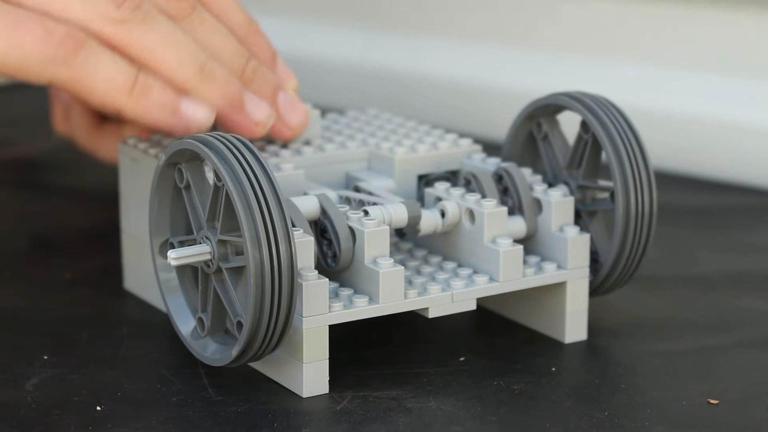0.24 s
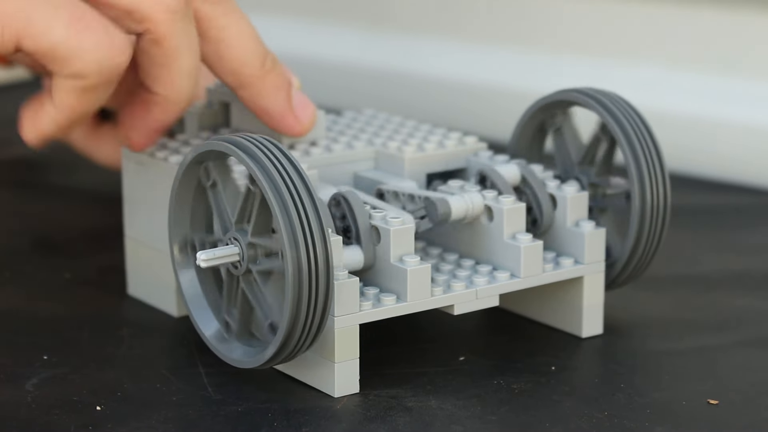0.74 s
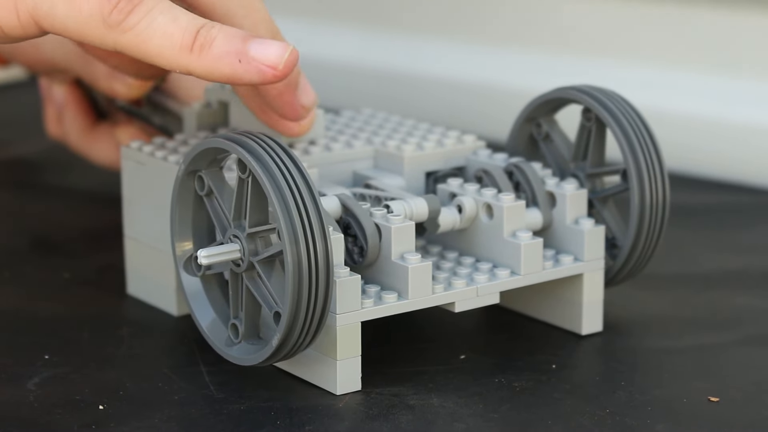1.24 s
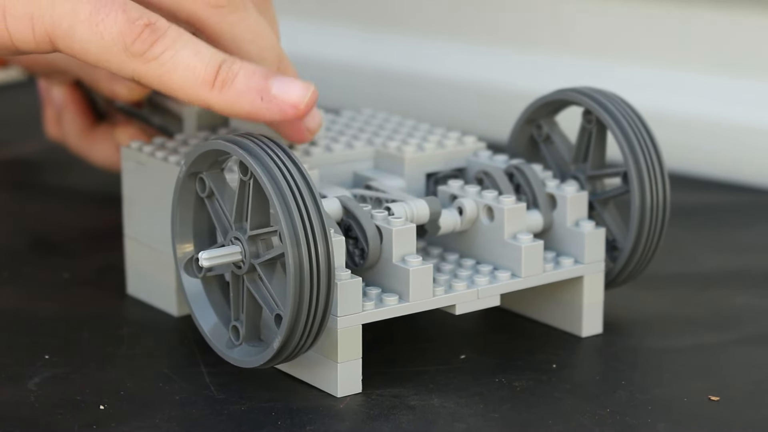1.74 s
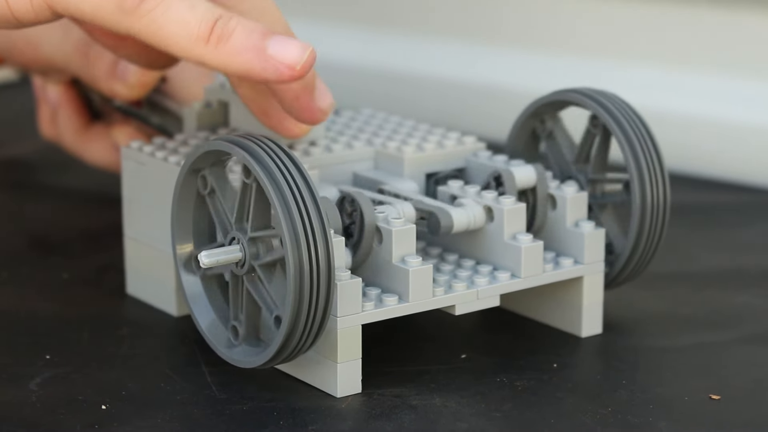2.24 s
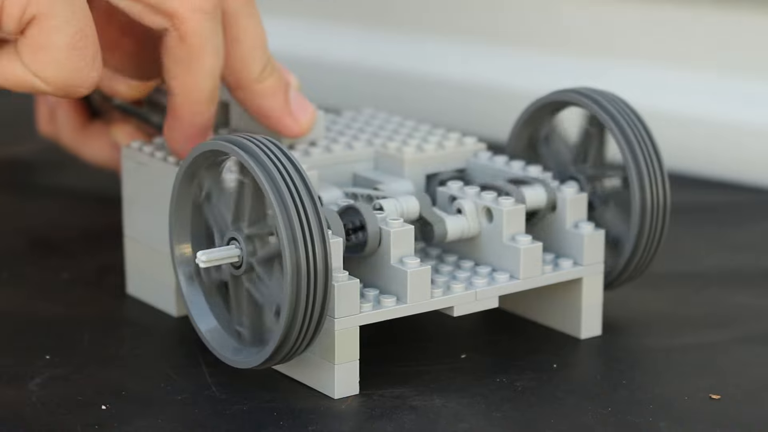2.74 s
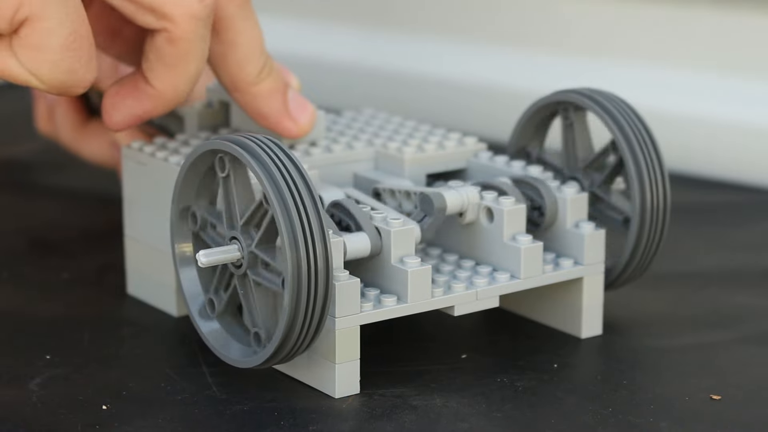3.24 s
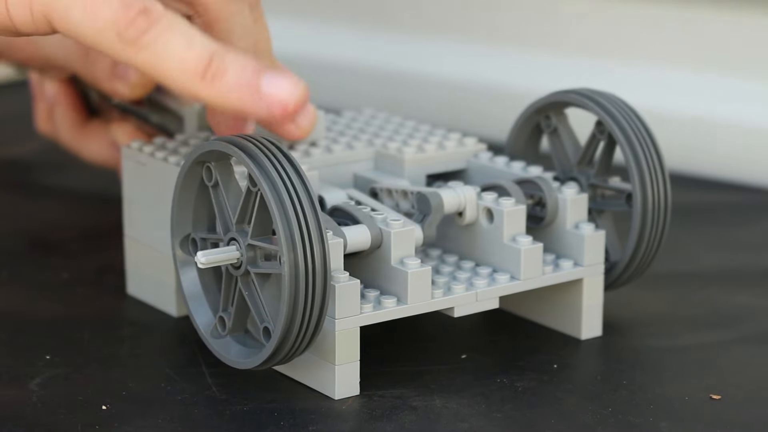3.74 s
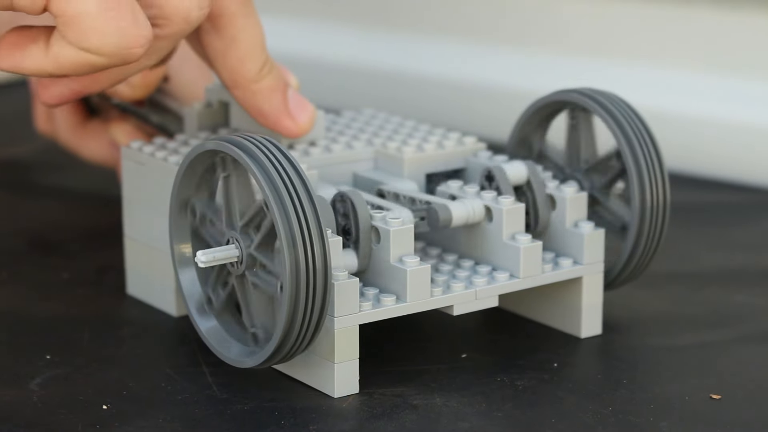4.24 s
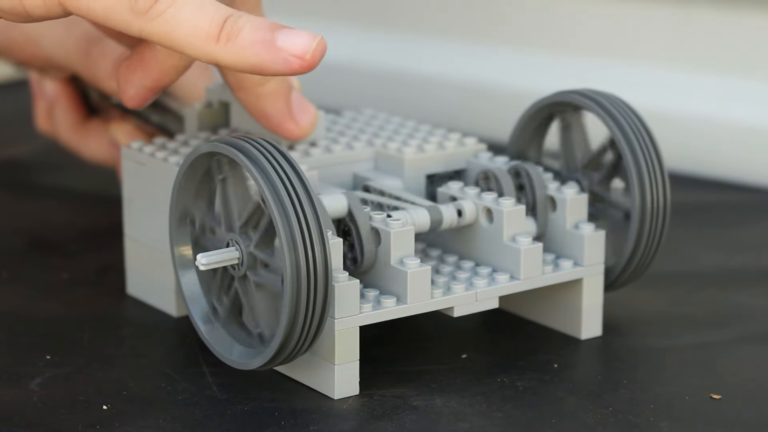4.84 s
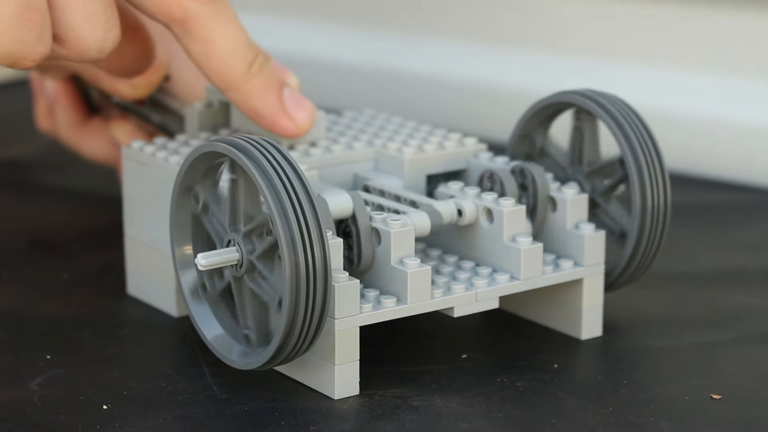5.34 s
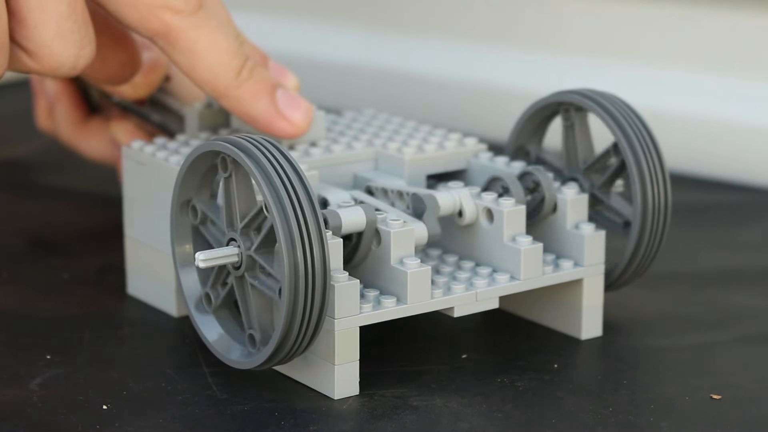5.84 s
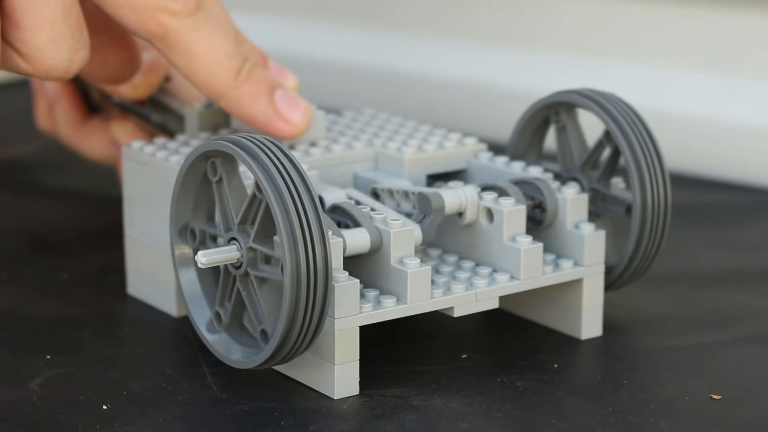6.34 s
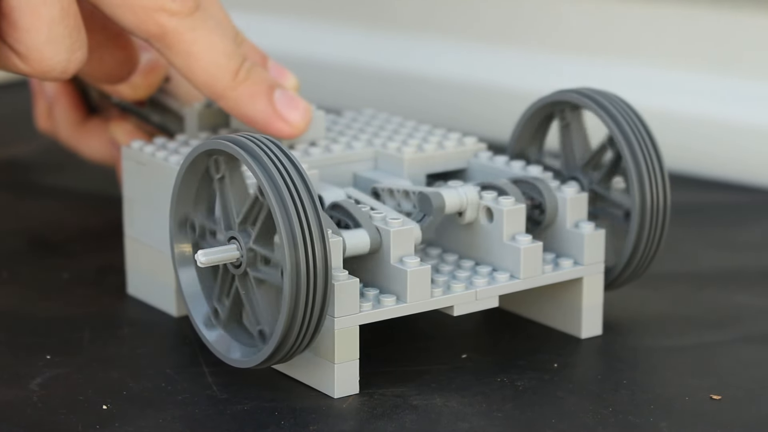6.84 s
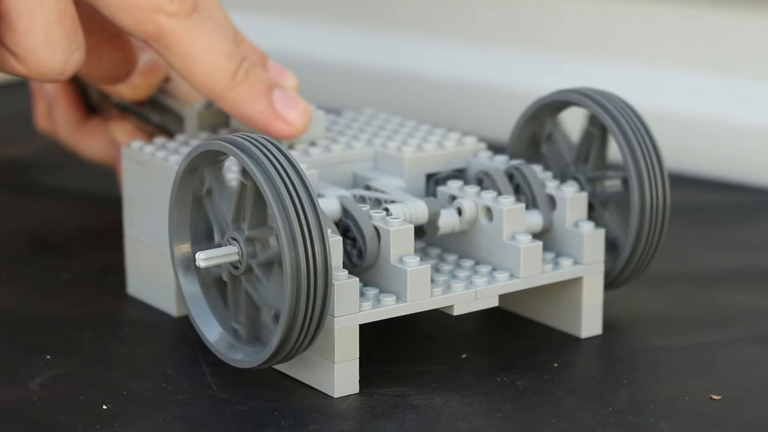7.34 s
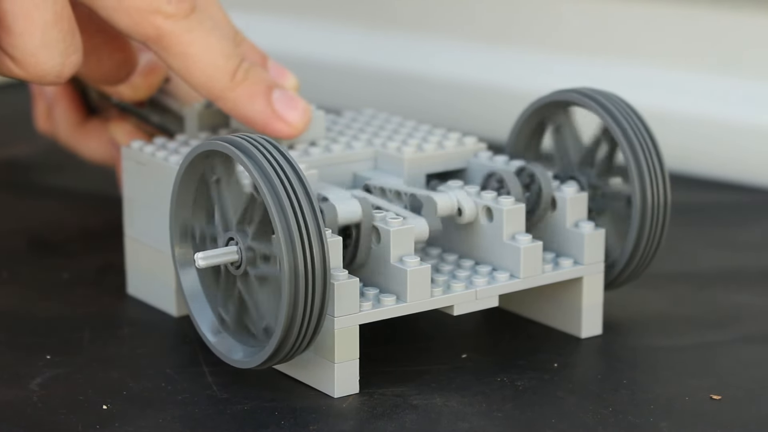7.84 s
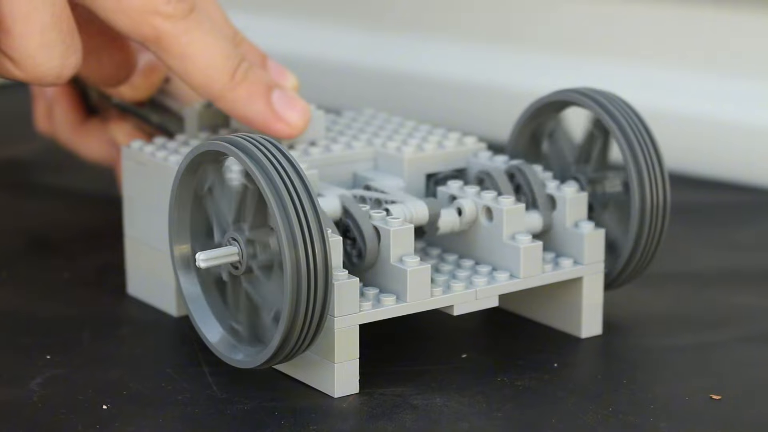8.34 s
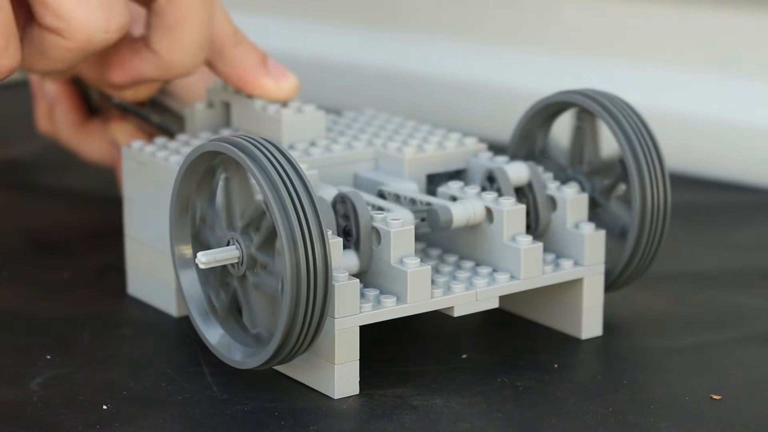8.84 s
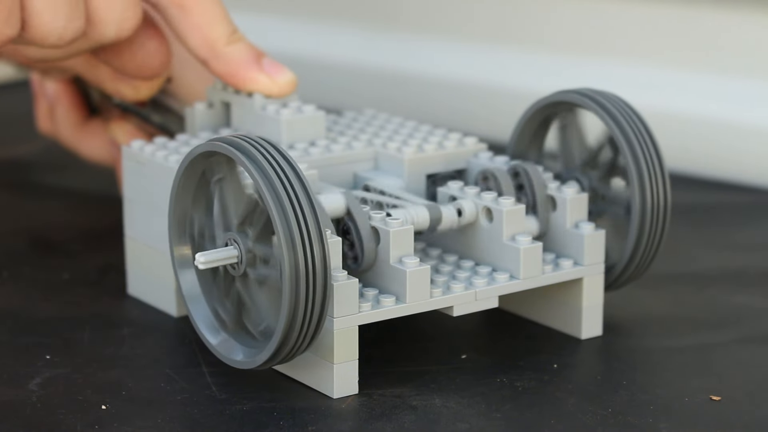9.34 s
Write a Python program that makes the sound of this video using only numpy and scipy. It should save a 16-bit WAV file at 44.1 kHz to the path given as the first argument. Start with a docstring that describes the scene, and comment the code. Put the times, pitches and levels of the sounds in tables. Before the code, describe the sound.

Close, sharp air hiss from a toy-sized piston engine, first constant, then chopped by uneven exhaust bursts that speed up to about five per second.

```python
"""Outdoors, on a table close by: a small plastic piston engine runs on compressed air.
At first it stands stalled and the air just leaks; nudged by a finger it turns in fits, then picks up speed.
The leak past the loose valve is shaped noise, and each turn lets out one exhaust puff, a short burst of noise.
Around it are a breeze that dies down, a faint low hum, soft finger scuffs and the knocks of a slack crank."""
import sys
import numpy as np
from scipy import signal
from scipy.fft import rfft, irfft, next_fast_len
from scipy.io import wavfile
from scipy.ndimage import map_coordinates

SR = 44100
rng = np.random.default_rng(int(sys.argv[2]) if len(sys.argv) > 2 else 0)


def generate_wav(signal):
    """Clip the signal to [-1, 1] and save it as 16-bit WAV at the path in sys.argv[1]."""
    frames = np.transpose(np.atleast_2d(signal))
    scaled = np.clip(frames, -1, 1) * 32767
    pcm = np.round(scaled).astype(np.int16)
    wavfile.write(sys.argv[1], SR, pcm)


N = 422919
TIME = np.arange(N) / SR   # s
FREQS = np.maximum(np.fft.rfftfreq(2 ** 15, 1 / SR), 1)   # Hz, kept above zero for the logarithms
RUNS_FREE_S = 5.1   # from here on the engine turns without help


def from_db(db):
    """Turn decibels into gain."""
    return 10 ** (np.asarray(db) / 20)


def rms_one(x):
    """Scale a signal to an average strength (rms) of 1."""
    return x / np.sqrt(np.mean(x ** 2) + 1e-20)


def in_time(rows):
    """Draw one curve over time per column, straight between the rows."""
    s, *columns = np.transpose(rows)
    return [np.interp(TIME, s, column) for column in columns]


def gain_at(points, hz):
    """Read the gain off a (frequency, level) table, straight on a log-frequency axis."""
    points = np.array(points)
    return from_db(np.interp(np.log(hz), np.log(points[:, 0]), points[:, 1]))


def noise(gain):
    """Make noise whose amplitude per root Hz is given on FREQS."""
    size = next_fast_len(N, True)
    gain = np.interp(np.fft.rfftfreq(size, 1 / SR), FREQS, gain)
    real, imaginary = rng.standard_normal((2, len(gain)))
    return irfft((real + 1j * imaginary) * gain, size)[:N] * np.sqrt(SR * size) / 2


def drift(rate):
    """Wander at random, up to about this rate per second, with a spread of 1."""
    step = 20   # samples between the points of the curve
    size = N // step + 2
    hz = np.fft.rfftfreq(size, step / SR)
    slow = irfft(rfft(rng.standard_normal(size)) / (1 + (hz / rate) ** 2), size)
    return np.interp(np.arange(N) / step, np.arange(size), rms_one(slow))


def plateau_at(s, length):
    """Find the samples around a moment, and a flat-topped hump of height 1 over them."""
    near = slice(max(int((s - length) * SR), 0), int((s + length) * SR))
    return near, np.exp(-np.abs(2 * (TIME[near] - s) / length) ** 4)


# how far the valve rests in its stalled position: (time [s], share [0-1])
VALVE_STALL = [(0, 0.96), (1.35, 0.97), (1.6, 0.34), (2.0, 0.04)]


def stalled_share():
    """Follow the valve from its stalled position (near 1) to running (near 0)."""
    return in_time(VALVE_STALL)[0]


def unrest(stalled_calm=0.35):
    """The air stream is calmer while the engine stands and restless once it moves."""
    return 1 - stalled_calm * stalled_share()


# exhaust puffs, one per turn: (time of the middle [s], length [s], level before a common trim [dB per Hz])
EXHAUST_PUFFS = [(1.64, 0.27, -61), (1.935, .092, -63), (2.093, 0.11, -60), (2.726, 0.079, -59),
                 (2.985, .11, -60), (3.918, 0.074, -61.5), (4.14, 0.075, -59), (4.458, 0.093, -60),
                 (4.858, .11, -60), (5.386, .16, -59.5), (5.969, 0.15, -59.5), (6.579, 0.16, -60),
                 (7.016, 0.13, -60.5), (7.367, 0.091, -60), (7.666, .084, -59.5), (7.923, 0.082, -60.5),
                 (8.162, 0.078, -59.5), (8.381, 0.055, -60), (8.593, .062, -59.5), (8.802, .068, -60),
                 (9.002, 0.061, -60), (9.2, 0.083, -60.5), (9.393, 0.067, -59.5), (9.59, 0.081, -60)]


def crank_turns():
    """The crank turns once from puff to puff."""
    return np.interp(TIME, [puff[0] for puff in EXHAUST_PUFFS], np.arange(len(EXHAUST_PUFFS)))


def around_puffs(overlap):
    """Rise to 1 during each puff, its length stretched by the overlap."""
    out = np.zeros(N)
    for s, length, _ in EXHAUST_PUFFS:
        near, hump = plateau_at(s, length * overlap)
        out[near] += hump
    return np.minimum(out, 1)


# wind rumble, only its shape counts: (frequency [Hz], relative level [dB])
WIND_RUMBLE = [(15, -20), (26, 0.5), (36, 1.5), (52, -1.5), (75, -4), (130, -7.5), (180, -12), (400, -20.5),
               (800, -25)]
# still outdoor air: (frequency [Hz], level [dB per Hz])
STILL_AIR = [(20, -100), (90, -94.5), (125, -90), (170, -99.5), (210, -94), (265, -102.5), (330, -90),
             (430, -103), (1500, -110)]
# the low hum before it wavers: (time [s], level [dB])
LOW_HUM = [(0, -60), (.6, -56.5), (.9, -56.5), (1.5, -57), (1.7, -65), (2.6, -67.5), (3.1, -75),
           (9.59, -91)]
HUM_HZ = 108
# a light breeze blows at first, then dies down
BREEZE_DB, LULL_DB, BREEZE_SAG_DB_PER_S = -51.5, -69.5, 1.5
BREEZE_ENDS_S, LULL_STARTS_S = 1.5, 1.75


def outdoors(gust_db=0.5, gust_rate=3, wander_hz=6.2, waver_db=2.5, octave_db=-18.5):
    """Rumbling noise for the breeze, faint noise for still air, and a hum of two tones that wander in pitch."""
    blowing = np.interp(TIME, [BREEZE_ENDS_S, LULL_STARTS_S], [1, 0])
    breeze_db = BREEZE_DB - BREEZE_SAG_DB_PER_S * TIME
    wind_db = blowing * breeze_db + (1 - blowing) * LULL_DB + gust_db * drift(gust_rate)
    rumble = gain_at(WIND_RUMBLE, FREQS) * (FREQS < WIND_RUMBLE[-1][0])
    wind = from_db(wind_db) * rms_one(noise(rumble))
    phase = 2 * np.pi * np.cumsum(HUM_HZ + wander_hz * drift(12.7)) / SR
    tone = np.sqrt(2) * (np.sin(phase) + from_db(octave_db) * np.sin(2 * phase))
    hum = from_db(in_time(LOW_HUM)[0] + waver_db * drift(11)) * tone
    return wind + hum + noise(gain_at(STILL_AIR, FREQS))


# where in each turn the slack crank knocks: (crank angle [turns], relative level [dB])
KNOCK_ANGLES = [(.23, 0), (.6, -1.5)]
# knock level at this speed before a common trim, and how much harder it gets when the speed doubles
KNOCK_DB, KNOCK_AT_TURNS_PER_S, KNOCK_DB_PER_DOUBLING = -52.5, 5, 11


def crank_knocks():
    """The slack crank knocks twice a turn, harder as it speeds up: rows of (time [s], level [dB])."""
    times = [puff[0] for puff in EXHAUST_PUFFS]
    rows = []
    for s, period in zip(times, np.diff(times)):
        if s <= RUNS_FREE_S:
            continue
        speed_db = -KNOCK_DB_PER_DOUBLING * np.log2(period * KNOCK_AT_TURNS_PER_S)
        for angle, db in KNOCK_ANGLES:
            rows.append((s + angle * period, KNOCK_DB + db + speed_db))
    return rows


# soft scuffs of the finger on the frame: (time [s], level before a common trim [dB])
FINGER_SCUFFS = [(.659, -43), (.709, -38), (.744, -42), (.789, -49), (1.88, -44.5), (2.727, -46),
                 (2.794, -48)]
# what the frame resounds with on the table: (frequency [Hz], width [Hz], relative level [dB])
FRAME_RESONANCES = [(126, 42, -10), (207, 25, -6), (326, 45, 2.5), (484, 270, -11)]
KNOCK_DECAY_S = .17   # time to fade by 60 dB


def knocks(trim_db=-1.5, rise_s=.007):
    """Each touch is a short soft scrape that fades, coloured by the frame's resonances."""
    colour = sum(from_db(db) / (1 + (2 * (FREQS - hz) / width) ** 2) for hz, width, db in FRAME_RESONANCES)
    force = np.zeros(N)
    for s, db in list(FINGER_SCUFFS) + crank_knocks():
        near = (TIME > s - rise_s) & (TIME < s + KNOCK_DECAY_S)
        age = TIME[near] - s + rise_s
        rise = 1 - np.exp(-age / rise_s)
        fade = np.exp(-np.log(1000) * age / KNOCK_DECAY_S)
        force[near] += from_db(db + trim_db) * rise * fade
    return force * rms_one(noise(colour))


# reflections off the moving rods and wheels:
# (delay [s], swing of the delay [s], gain [factor], crank angle [turns])
ROD_REFLECTIONS = [(.00163, 0.000019, -0.085, 0), (.00294, 0.000033, 0.086, 0.42),
                   (.00385, .00002, 0.096, .6)]


def off_the_rods(air):
    """The short echo paths swing with the crank, and the hiss swirls in step."""
    turns = crank_turns()
    out = air.copy()
    for delay, swing, gain, angle in ROD_REFLECTIONS:
        lag = delay + swing * np.cos(2 * np.pi * (turns + angle))
        out += gain * np.interp(TIME - lag, TIME, air)
    return out


def sputter(flutter_db=0.37, flutter_rate=220, waver_db=0.52, waver_rate=22):
    """The rattling valve makes the whole stream flutter a little."""
    return from_db(unrest() * (flutter_db * drift(flutter_rate) + waver_db * drift(waver_rate)))


# resonances of the gaps and hollows in the housing, at full ring: (frequency [Hz], width [Hz], lift [dB])
HOUSING_RESONANCES = [(1010, 620, 0.5), (1610, 380, 4), (2287, 270, 4.5), (3330, 830, 1), (4032, 210, 4),
                      (5350, 98, 9.5), (5950, 270, 4), (6300, 250, 8.5), (6865, 140, 6.5), (7600, 260, 2),
                      (7930, 350, 3), (8360, 330, 6), (8800, 260, 6.5), (9510, 420, 9), (10214, 540, 9),
                      (10700, 210, 7), (11180, 290, 9), (12150, 160, 0), (12450, 219, 7),
                      (13050, 230, 10.5)]


def housing_db(hz):
    """The housing lifts the hiss at each of its resonances."""
    return sum(db * np.exp(-(2 * (hz - centre) / width) ** 2) for centre, width, db in HOUSING_RESONANCES)


def small_source(hz, edge_hz=330):
    """So small an outlet radiates hardly any bass."""
    return 1 / np.sqrt(1 + (edge_hz / hz) ** 6)


# colour of the blow-by before housing and outlet: (frequency [Hz], level [dB per Hz])
BLOW_BY_COLOUR = [(400, -98), (900, -84.5), (2500, -74), (3900, -63.5), (6000, -97), (8500, -80),
                  (10600, -59.5), (12800, -69), (15500, -81)]
# the valve sticks ajar once and air blows past it
BLOW_BY_START_S, BLOW_BY_END_S, BLOW_BY_EDGE_S, BLOW_BY_SAG_DB_PER_S = 3.295, 3.7, 0.024, 3.5


def blow_by(ring=0.64):
    """A bright hiss that starts fast, sags with the pressure and is cut off when the valve moves on."""
    since_start = TIME - BLOW_BY_START_S
    gate = np.clip(np.minimum(since_start, BLOW_BY_END_S - TIME) / BLOW_BY_EDGE_S, 0, 1)
    sag = from_db(-BLOW_BY_SAG_DB_PER_S * np.maximum(since_start, 0))
    colour = gain_at(BLOW_BY_COLOUR, FREQS) * from_db(ring * housing_db(FREQS)) * small_source(FREQS)
    return gate * sag * noise(colour)


# the faltering crank catches and pinches the leak, before each band's own throttling:
# (time of the middle [s], length [s], loss [dB])
CRANK_CATCHES = [(2.22, 0.092, 0.5), (2.797, 0.059, 2), (3.087, 0.063, 2), (3.76, 0.22, 2.5),
                 (4.01, 0.11, 2.5), (4.6, .16, 1.2), (4.984, 0.057, 0)]
PORT_SHUTS = 0.53   # share of the leak's power that a puff takes away, before each band's own throttling


def valve_opening(overlap):
    """The leak is throttled from just before each puff until just after it, and wherever the crank catches."""
    pinch_db = np.zeros(N)
    for s, length, db in CRANK_CATCHES:
        near, hump = plateau_at(s, length)
        pinch_db[near] += db * hump
    return np.sqrt(1 - PORT_SHUTS * around_puffs(overlap)) * from_db(-pinch_db)


def stroke_swing(throb_angle=-0.027, fitful_share=.35):
    """A swing that peaks twice a turn, once per stroke, and is fullest once the engine runs free."""
    turning = 1 - stalled_share()
    steady = np.interp(TIME, [RUNS_FREE_S - 1, RUNS_FREE_S], [fitful_share, 1])
    return turning * steady * np.cos(2 * np.pi * 2 * (crank_turns() + throb_angle))


def piston_bend(air, creep_per_s=0.01398, stall_middle_s=.7, bend=.011):
    """The piston resizes the hollows: their pitch creeps up in the stall, then arches once per turn."""
    stalled = stalled_share()
    creep_fades = np.interp(TIME, [2 * stall_middle_s, EXHAUST_PUFFS[0][0]], [1, 0])
    creep = creep_per_s * (TIME - stall_middle_s) * creep_fades
    pace = 1 + stalled * creep - bend * (1 - stalled) * np.cos(2 * np.pi * crank_turns())
    return map_coordinates(air, [np.cumsum(pace)], order=3, mode="mirror")   # replay at this pace


# the leak while running, before housing, outlet and slow levels: (frequency [Hz], level [dB per Hz])
RUNNING_COLOUR = [(350, -101), (500, -90.5), (800, -80.5), (1900, -77.5), (2900, -71), (3900, -62),
                  (4900, -72.5), (5750, -78), (7000, -64.5), (9100, -69), (10400, -61), (11900, -68),
                  (13200, -74), (15500, -86.0)]
# the same while stalled: (frequency [Hz], level [dB per Hz])
STALLED_COLOUR = [(400, -88), (750, -72.5), (1500, -72), (2550, -70.5), (3150, -61.5), (4000, -57.5),
                  (4750, -59), (5750, -70.5), (6300, -65.5), (7400, -70), (9300, -64.5), (11350, -57),
                  (12650, -74.5), (15500, -78.2)]
# slow changes of the leak before small trims:
# (time [s], hollow note level [dB], jet hiss level [dB], extra sizzle on top [dB])
SLOW_LEVELS = [(0, -7, -0.5, 0), (.3, -0.5, 1.3, .2), (.9, -0.9, 0, .5), (1.3, -.3, -1, 2),
               (1.58, 7.5, 0, 1), (1.72, 3.2, 1.7, -2), (2.55, 2, -1, -1), (3.2, 0, 0, -3),
               (4.2, -0.3, 0, -0.5), (4.9, -0.7, -2, 0), (5.4, -0.75, 0, 1.5), (8.9, -1.35, -.2, 1.7),
               (9.59, -1.7, -1, 3)]


def leak(rush_edge_hz=2700, hollow_edge_hz=5700, jet_edge_hz=9200, sizzle_edge_hz=12000,
         stalled_ring=0.25, rush_follows=0.45, low_jet_db=-0.07, patchy_db=1.0):
    """Turbulent air at the valve: a low rush, the cylinder's hollow note, a jet hiss in two parts and a sizzle."""
    hollow_db, jet_db, sizzle_db = in_time(SLOW_LEVELS)
    stalled = stalled_share()

    # split the power into bands
    rush = 1 / (1 + (FREQS / rush_edge_hz) ** 12)
    hollow = 1 / (1 + (FREQS / hollow_edge_hz) ** 12) - rush
    sizzle = 1 / (1 + (sizzle_edge_hz / FREQS) ** 24)
    jet = 1 - rush - hollow - sizzle
    low_jet = jet / (1 + (FREQS / jet_edge_hz) ** 30)
    high_jet = jet - low_jet

    ring_db, radiated = housing_db(FREQS), small_source(FREQS)
    running_colour = gain_at(RUNNING_COLOUR, FREQS) * from_db(ring_db) * radiated
    stalled_colour = gain_at(STALLED_COLOUR, FREQS) * from_db(stalled_ring * ring_db) * radiated
    low_opening, high_opening = valve_opening(1.48), valve_opening(1.57)
    swing = stroke_swing()
    wander_db = patchy_db * unrest()

    # (share of the power, level [dB], throttling, throb with the strokes [dB])
    bands = [(rush, rush_follows * hollow_db, low_opening ** 0.74, 0.5),
             (hollow, hollow_db, low_opening ** 0.74, -0.4),
             (low_jet, jet_db + low_jet_db, low_opening ** 1.56, 2.3),
             (high_jet, jet_db, high_opening ** 1.4, 0.26),
             (sizzle, jet_db + sizzle_db, high_opening ** 0.8, 0.0)]
    out = 0
    for share, db, opening, throb_db in bands:
        band = np.sqrt(np.maximum(share, 0))
        running_air = np.sqrt(1 - stalled) * noise(band * running_colour)
        stalled_air = np.sqrt(stalled) * noise(band * stalled_colour)
        level = from_db(db + throb_db * swing + wander_db * drift(9.1))
        out = out + level * opening * (running_air + stalled_air)
    return out


# the exhaust jet, which shifts as the finger on the housing moves: (time [s], centre [Hz], width [Hz])
EXHAUST_JET = [(1.6, 9600, 2200), (2.1, 9150, 2650), (4.9, 9200, 2850), (5.3, 7620, 2060),
               (9.03, 7763, 2110), (9.17, 10040, 2000)]
# broad rush around a puff's jet: (frequency [Hz], level relative to the jet [dB])
RUSH_AROUND_JET = [(350, -37), (800, -18.5), (2800, -13.0), (3800, -4), (5500, -15.5), (7000, -11),
                   (11500, -6.5), (15500, -27)]


def exhaust(ring=0.46, trim_db=1.0, low_share=0.78, high_share=1.065, low_lag=0.13, high_lag=-0.054):
    """The port slides open and shut: first a high jet over a broad rush, then a lower, shorter jet."""
    size = 2 ** 15   # samples of noise for one puff
    hz = FREQS
    colour = from_db(ring * housing_db(hz) + trim_db) * small_source(hz) * np.sqrt(SR / 2)
    jet_s, centres_hz, widths_hz = np.transpose(EXHAUST_JET)
    out = np.zeros(N + 2 * size)
    for s, length, db in EXHAUST_PUFFS:
        centre_hz, width_hz = np.interp(s, jet_s, centres_hz), np.interp(s, jet_s, widths_hz)
        jet = 1 / (1 + np.abs(2 * (hz - centre_hz) / width_hz) ** 6)
        low = jet / (1 + (hz / centre_hz) ** 30)
        high = jet - low + gain_at(RUSH_AROUND_JET, hz) ** 2
        start = round(s * SR) + size // 2
        puff_age = (np.arange(size) - size / 2) / (SR * length)   # in puff lengths from the middle
        # share and lag are in puff lengths too
        for power, share, lag in [(low, low_share, low_lag), (high, high_share, high_lag)]:
            stroke = 2 * (puff_age - lag) / share
            port = 1 / np.sqrt(1 + np.abs(stroke) ** 8)
            white = rng.standard_normal(size)
            hiss = irfft(rfft(white) * colour * np.sqrt(power))
            out[start:start + size] += from_db(db) * port * hiss
    return out[size:size + N]


def scene():
    """Everything reaches one microphone, the same in both channels."""
    stream = piston_bend(leak()) + blow_by() + exhaust()
    air = off_the_rods(stream * sputter())
    return np.tile(air + knocks() + outdoors(), (2, 1))


CUTOFF_HZ = 15750


def record(dry):
    """Cut the treble steeply above the cutoff with a low-pass filter."""
    low_pass = signal.ellip(12, .1, 80, CUTOFF_HZ, fs=SR, output="sos")
    return signal.sosfilt(low_pass, dry)


dry = scene()
out = record(dry)
generate_wav(out)
```